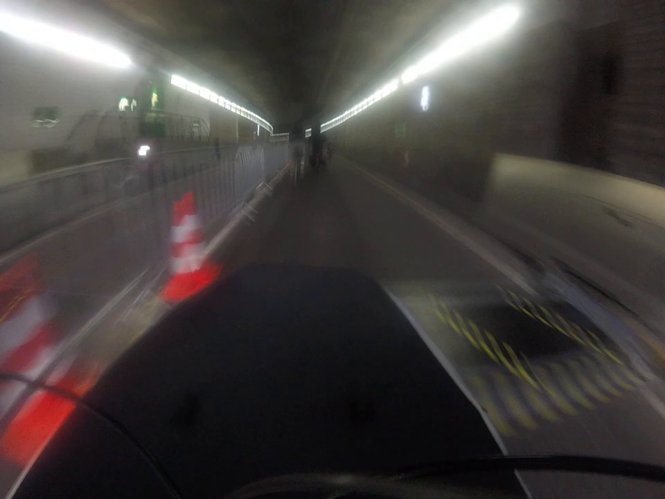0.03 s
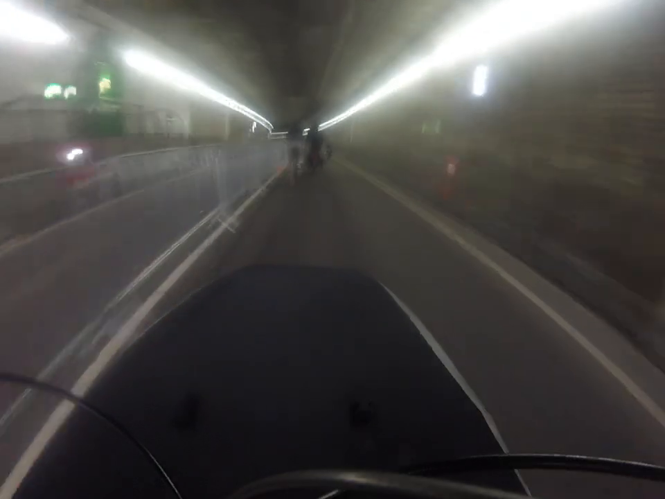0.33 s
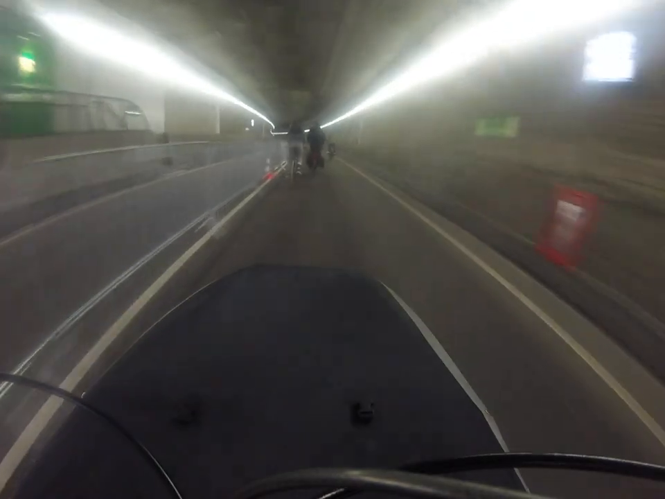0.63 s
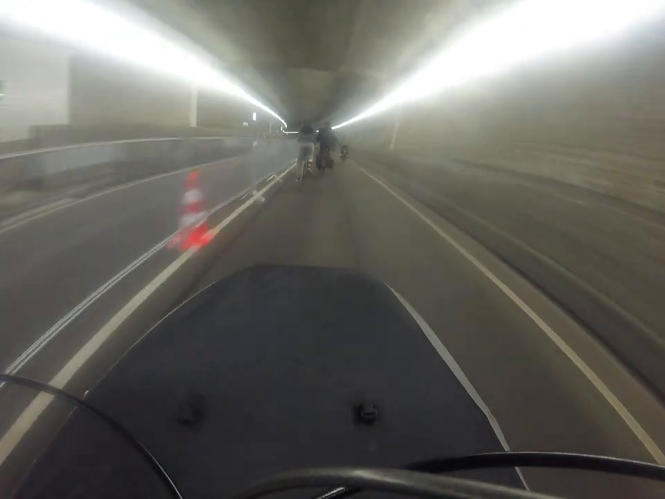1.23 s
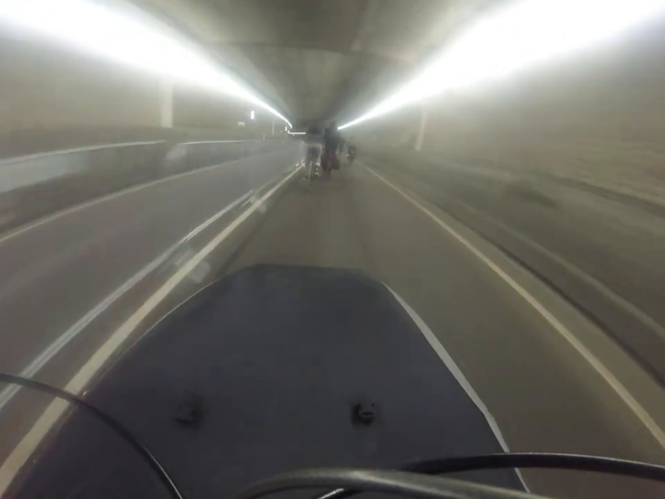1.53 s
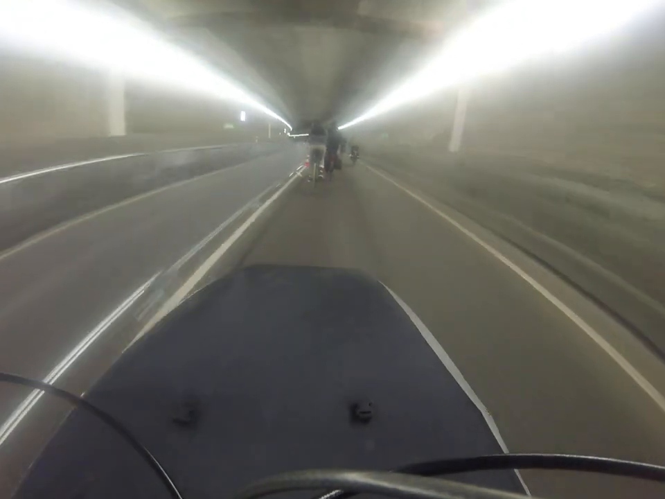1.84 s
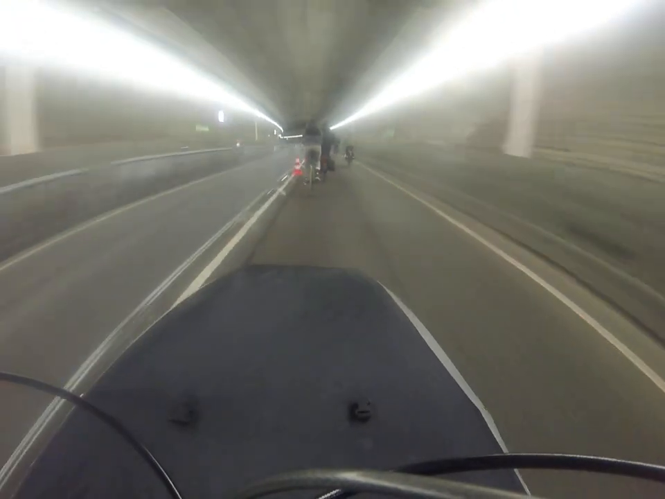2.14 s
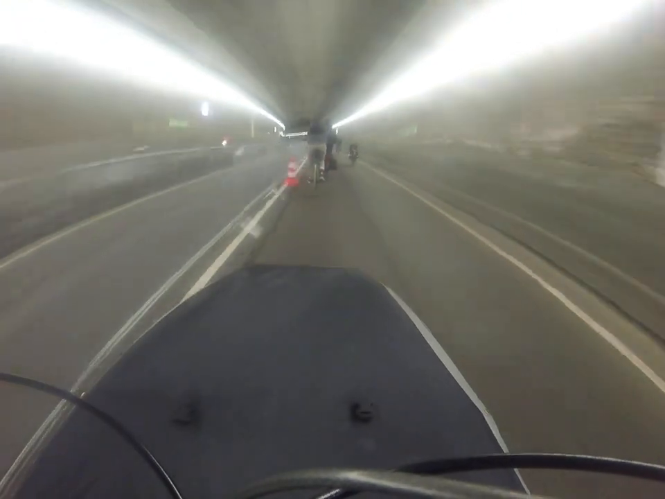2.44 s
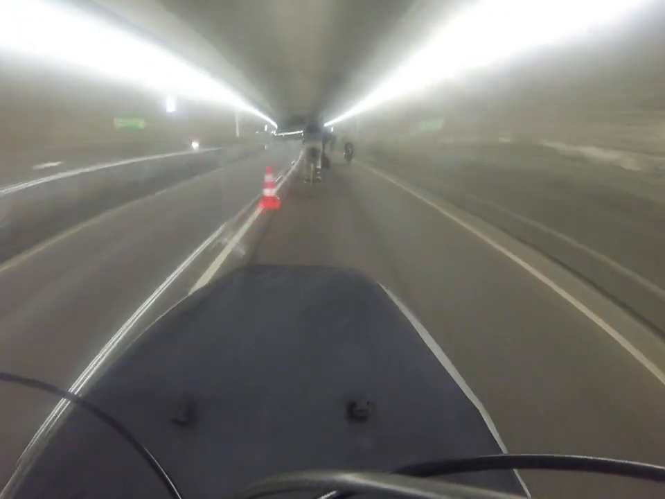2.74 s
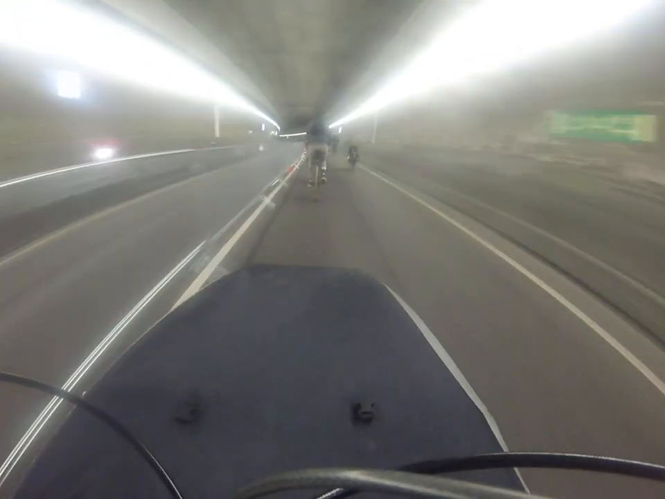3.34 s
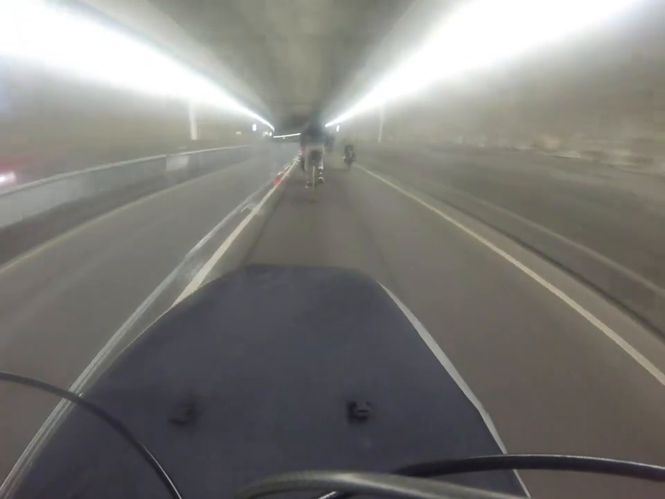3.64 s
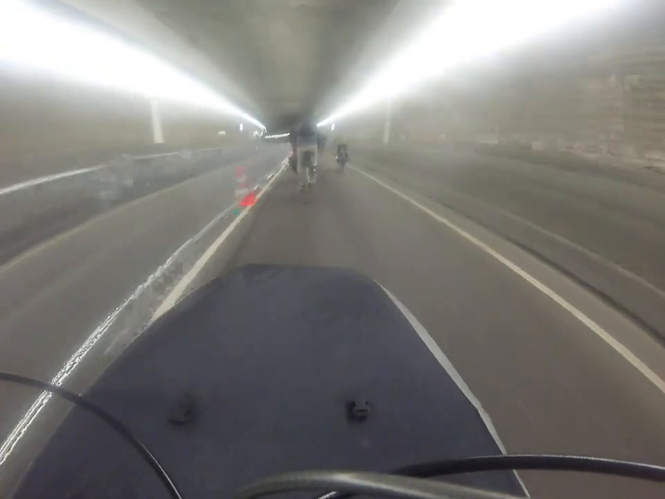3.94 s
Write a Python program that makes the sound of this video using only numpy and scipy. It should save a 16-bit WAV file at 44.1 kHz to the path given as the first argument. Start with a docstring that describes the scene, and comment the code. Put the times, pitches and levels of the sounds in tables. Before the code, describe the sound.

Heard up close, a moving bicycle rumbles and thumps along a concrete tunnel, with buffeting wind, humming tyres and scattered hollow knocks. Later the level suddenly drops, a loose part clacks, and the rumble creeps back.

```python
"""Faired bicycle in a road tunnel

Asphalt grain drums the shell, the frame booms, throbs and thumps over bumps, and the tread hums.
Wind buffets over a wash of tyre noise, chain rustle and a thin metal jingle. Panels knock, a loose
fitting clacks and a brake disc sings faintly as it rubs; these echo down the concrete tube.
Past the middle the whole sound ducks suddenly and creeps back."""
import sys
import numpy as np
from scipy import signal
from scipy.fft import rfft, irfft
from scipy.io import wavfile

SR = 44100
rng = np.random.default_rng(int(sys.argv[2]) if len(sys.argv) > 2 else 0)


def generate_wav(sig):
    """Save sig (samples, or channels by samples) to the path in sys.argv[1] as 16-bit PCM at SR."""
    pcm = np.round(np.clip(np.atleast_2d(sig).T, -1, 1) * 32767).astype(np.int16)
    wavfile.write(sys.argv[1], SR, pcm)


N = 176400

# Level rides for the jingle, the tyre and chain hiss, the wind, the frame's throb and boom, and the
# road's drumming on the shell. Each row: time in seconds, relative level in dB.
JINGLE_RIDE = [(0.05, -70), (0.15, -64), (0.38, -64.5), (0.6, -73), (1.5, -71.5), (2.4, -69.5),
               (2.59, -60.5), (2.8, -69.5), (3.1, -72.5), (4.0, -74)]
HISS_RIDE = [(0.05, -54), (0.14, -49.5), (0.26, -52), (0.39, -52), (0.55, -54), (0.72, -54.5), (1.0, -52.3),
             (1.5, -51.3), (2.0, -48.5), (2.36, -49), (2.45, -46), (2.49, -48.5), (2.75, -50.5), (3.1, -51),
             (3.6, -51.5), (4.0, -50.5)]
WIND_RIDE = [(0.05, -22.5), (0.5, -30), (0.8, -30.5), (1.4, -27.5), (1.75, -22.5), (2.4, -25.5),
             (2.7, -32.5), (3.3, -27.5), (3.7, -24.5), (4.0, -19.5)]
THROB_RIDE = [(0.05, -41), (1.3, -42), (1.4, -18), (1.48, -18), (1.57, -30), (1.68, -18.5), (1.79, -30),
              (1.87, -15.5), (2.0, -28), (2.2, -32), (4.0, -47)]
BOOM_RIDE = [(0.05, -23), (0.42, -21), (0.6, -28.5), (1.1, -19.5), (1.3, -29), (1.45, -24), (1.9, -25),
             (2.1, -21), (2.35, -22.5), (2.6, -18), (3.0, -22), (3.4, -25), (3.7, -16.5), (4.0, -28)]
ROAD_RIDE = [(0.05, -30), (0.2, -25.5), (0.45, -26.5), (0.75, -28.5), (1.0, -22.5), (1.22, -24.5),
             (1.55, -26), (1.8, -23.5), (2.05, -24), (2.42, -21), (2.6, -20), (2.85, -23.5), (3.0, -23),
             (3.25, -25), (3.6, -26), (4.0, -24)]
# EQ curves for wind, tyres and chain. Each row: frequency in Hz, relative gain in dB.
WIND_EQ = [(8, -24.5), (20, -4), (35, 5.5), (90, -15.5), (150, -1), (200, -10.5), (320, -13.5),
           (700, -24.5), (1500, -61)]
TYRE_EQ = [(300, -8), (700, 9), (1000, 4), (1500, -4), (2100, -6.5), (2800, -10.5), (3500, -17),
           (4300, -20), (7000, -26), (9300, -32.5), (10500, -40)]
CHAIN_EQ = [(3000, -19), (4200, -11.5), (4800, -0.5), (5450, 0.5), (5800, -2), (6200, -8), (6750, -7),
            (7100, -11.5), (8400, -16.5), (8750, -10.5), (9500, -28), (10000, -33.5)]
# The brake disc's tones. Each row: ratio to the pitch, relative level in dB.
DISC_TONES = [(.847, -4), (.925, -8.5), (1, -1.5)]
# Disc rubs, roughly one a wheel turn.
# Each row: centre in seconds, length in seconds, level in dB, pitch in Hz.
DISC_RUBS = [(0.995, 0.11, -65, 5320), (1.229, 0.14, -65, 5400), (1.488, 0.075, -63, 5380),
             (1.735, 0.11, -65.5, 5450), (2, 0.13, -66, 5437), (2.218, 0.11, -61.5, 5430),
             (2.43, .06, -63.5, 5530), (3.22, 0.043, -60, 5555), (3.27, .03, -62, 5580),
             (3.418, 0.046, -55.5, 5630), (3.497, .05, -62, 5570), (3.667, 0.04, -59, 5520),
             (3.706, 0.021, -59, 5620), (3.932, 0.14, -63, 5530)]
# Tiny bright ticks. Each row: start in seconds, level in dB, band centre in Hz.
BRIGHT_TICKS = [(2.456, -43, 7400), (2.587, -49, 6003), (2.694, -46, 6069), (3.735, -42, 5740)]
# Clacks of a loose fitting. Each row: start in seconds, level in dB, low-pass cutoff in Hz.
FITTING_CLACKS = [(0.062, -25, 2600), (2.594, -26, 910), (2.8432, -14.5, 5000), (2.8472, -18.5, 3000),
                  (2.861, -18.5, 2100), (2.867, -24, 1700)]
# The fitting's modes. Each row: frequency in Hz, relative level in dB, 60 dB decay time in seconds.
FITTING_MODES = [(580, -1, 0.07), (780, 1, .03), (1200, 3.5, 0.026), (1436, -4, .025), (1740, -6, 0.02),
                 (2110, -4.5, 0.022), (2760, -4.5, 0.016), (3155, -7.5, 0.018), (3780, -11.5, 0.02),
                 (5030, -16, .01), (6300, -15, .015)]
# Hits on a panel and on a small cover. Each row: start in seconds, level in dB, pitch in Hz.
PANEL_KNOCKS = [(0.059, -19.5, 510), (0.127, -12, 542), (0.1365, -11.5, 428), (0.180, -17, 474),
                (0.198, -19, 534), (0.217, -17, 421), (0.325, -9, 616), (0.445, -18.5, 440),
                (0.635, -17, 475), (0.892, -18.5, 467), (1.08, -18.5, 488), (1.536, -17, 428),
                (1.603, -17.5, 450), (1.728, -21.5, 316.6), (1.853, -18, 520), (2.070, -16.5, 477),
                (2.203, -16.5, 433), (2.385, -21.5, 451.5), (2.429, -11.5, 389)]
COVER_TAPS = [(0.083, -33, 1080), (0.179, -32, 1120), (0.214, -31, 1020), (2.495, -28, 1090),
              (2.512, -32, 1060), (2.599, -30, 1030), (3.138, -24, 1180), (3.171, -36, 1080)]
# Their modes. Each row: ratio to the pitch, relative level in dB, 60 dB decay time in seconds.
PANEL_MODES = [(.6, -11.5, 0.054), (0.789, 0, 0.021), (1, -0.5, 0.07), (1.299, -15, 0.021),
               (1.62, -27.5, 0.031)]
COVER_MODES = [(1, 4, 0.026), (1.22, -6.5, 0.019), (1.9, -11.5, 0.018)]
# The hum of the tyre tread. Each row: time in seconds, pitch in Hz, level in dB.
TREAD_HUM = [(0.051, 470.2, -43), (0.901, 463.2, -34), (1.152, 457.3, -54), (1.329, 457.6, -26),
             (1.44, 461, -34), (1.559, 459.7, -24.5), (1.78, 464, -37.5), (2.05, 468.4, -23.5),
             (2.179, 455, -30.5), (2.321, 450, -28), (2.5, 447, -30), (2.849, 431.8, -50),
             (3.001, 433, -23), (3.202, 448.4, -44.5), (3.551, 459.8, -35), (4.0, 457, -46)]
# Bumps that heave the frame. Each row: start in seconds, level in dB, pitch in Hz.
ROAD_BUMPS = [(0.05, -11, 42.1), (0.097, -9.5, 49.5), (0.143, -7.5, 45.6), (0.356, -11, 49.6),
              (2.257, -9.5, 43), (2.492, -4, 43.2), (2.703, -7.5, 30.5), (3.767, -11, 52.3)]
# The shell's resonances. Each row: centre in Hz, width in Hz, relative gain in dB.
SHELL_MODES = [(119, 28, -3), (164.8, 20.7, -6), (242.3, 34.3, -3), (301.3, 41, -8.5), (340.8, 25.5, -1),
               (406.5, 65, 0), (452, 51, -1.5), (502, 41, 0), (589, 117, -13), (688, 80, -13),
               (763, 95, -20), (909, 45, -19.5), (1026, 58, -26.5), (1397, 58, -30.5)]


def undb(db):
    """Decibels to gain."""
    return 10 ** (np.asarray(db) / 20)


def unit(x):
    """Scale to rms 1."""
    return x / np.sqrt(np.mean(x ** 2))


def clock():
    """Time of every sample, in seconds."""
    return np.arange(N) / SR


def ride(rows):
    """A fader move through (seconds, dB) points."""
    return undb(np.interp(clock(), *np.array(rows).T))


def wander(rate_hz):
    """Smooth random drift, rms 1."""
    f = np.arange(N // 2 + 1) * SR / N
    return unit(irfft(rfft(rng.standard_normal(N)) * np.exp(-(f / rate_hz) ** 2) * (f > 0), N))


def equalise(x, points):
    """EQ through (Hz, dB) points, rolled off past both ends, rms 1."""
    f = np.maximum(np.arange(N // 2 + 1) * SR / N, 1)
    hz, db = np.array(points).T
    gain = undb(np.interp(np.log(f), np.log(hz), db))
    roll_off = np.minimum(f / hz[0], 1) * np.minimum(hz[-1] / f, 1) ** 2
    return unit(irfft(rfft(x) * gain * roll_off, N))


def resonate(x, hz, width_hz):
    """A resonance with steep skirts: two band-passes in a row."""
    b, a = signal.iirpeak(hz, hz / (width_hz * np.pi / 2), fs=SR)
    return signal.lfilter(b, a, signal.lfilter(b, a, x))


def grains(per_s, spread_db=3):
    """A random spray of small, uneven impacts."""
    hit = rng.random(N) < per_s / SR
    polarity = np.sign(rng.standard_normal(N))
    return hit * polarity * undb(spread_db * np.minimum(rng.exponential(size=N), 5))


def decay(age, t60):
    """Envelope with a hard attack, falling 60 dB in t60 seconds."""
    return (age > 0) * np.exp(-np.log(1000) * np.clip(age / t60, 0, 10))


def ring(start, modes):
    """Decaying (Hz, dB, t60) modes struck together in alternating polarity, peak 1."""
    age = np.arange(SR // 2) / SR
    tone = sum((-1) ** k * undb(db) * np.sin(2 * np.pi * hz * age) * decay(age, t60)
               for k, (hz, db, t60) in enumerate(modes))
    return np.pad(tone / np.abs(tone).max(), (int(start * SR), N))[:N]


def tunnel(x, t60=5, predelay_s=.02, wet_db=-17.5):
    """The concrete tube returns a long, diffuse echo."""
    tail = rng.standard_normal(N) * decay(clock(), t60) * (clock() > predelay_s)
    return undb(wet_db) * signal.fftconvolve(x, tail / np.linalg.norm(tail))[:N]


def jingle():
    """A small metal part chatters at one high resonance."""
    return unit(resonate(grains(per_s=1800), hz=6480, width_hz=230)) * ride(JINGLE_RIDE)


def brake(waver_hz=8, flicker_db=2):
    """The disc brushes its pad and sings softly."""
    t, rubs = clock(), np.array(DISC_RUBS)
    touch = sum(undb(db) * np.exp(-(2 * (t - at) / length) ** 2) for at, length, db, _ in DISC_RUBS)
    pitch = np.interp(t, rubs[:, 0], rubs[:, 3])
    flicker = undb(flicker_db * wander(40))
    song = sum(undb(db) * np.sin(2 * np.pi * np.cumsum(ratio * pitch + waver_hz * wander(66)) / SR)
               for ratio, db in DISC_TONES)
    return touch * flicker * song


def tyres_and_chain(tyre_db=7, chain_db=-13):
    """A smooth wash of tyre noise and the chain's fine metallic rustle, both flickering slightly."""
    tyres = equalise(rng.standard_normal(N), TYRE_EQ) * undb(tyre_db + 0.35 * wander(25))
    chain = equalise(grains(per_s=5700, spread_db=-1), CHAIN_EQ) * undb(chain_db + wander(45))
    return (tyres + chain) * ride(HISS_RIDE)


def wind(gust_db=2, trim_db=-1):
    """Passing air buffets in low gusts."""
    rumble = equalise(rng.standard_normal(N), WIND_EQ)
    return rumble * undb(gust_db * wander(25) + trim_db) * ride(WIND_RIDE)


def ticks(t60=0.0053):
    """Tiny snaps of bright noise."""
    noise = rng.standard_normal(N)
    return sum(undb(db) * unit(resonate(noise, hz, hz / 2)) * decay(clock() - start, t60) / 2
               for start, db, hz in BRIGHT_TICKS)


def clacks(crack_db=-30.5, crack_hz=2320, crack_t60=0.016):
    """A loose fitting strikes and rings, with a crack of noise on the attack."""
    crack = undb(crack_db) * unit(resonate(rng.standard_normal(N), crack_hz, width_hz=crack_hz))
    out = np.zeros(N)
    for start, db, cutoff_hz in FITTING_CLACKS:
        blow = ring(start, FITTING_MODES) + crack * decay(clock() - start, crack_t60)
        out += undb(db) * signal.lfilter(*signal.butter(2, cutoff_hz, fs=SR), blow)
    return out


def knocks(hits, modes):
    """A panel or cover is struck and rings, short and hollow."""
    out = np.zeros(N)
    for start, db, hz in hits:
        tuned = [(hz * ratio, mode_db, t60) for ratio, mode_db, t60 in modes]
        out += undb(db) * ring(start, tuned)
    return out


def tread(width_hz=31.6, waver_hz=9, compression=0.9):
    """The tread drones in a rough, narrow band whose centre wanders with speed."""
    at, hz, db = np.array(TREAD_HUM).T
    rough = wander(width_hz) + 1j * wander(width_hz)
    evened = rough / (np.abs(rough) + .5) ** compression
    pitch = np.interp(clock(), at, hz) + waver_hz * wander(7.97)
    drone = (evened * np.exp(2j * np.pi * np.cumsum(pitch) / SR)).real
    return unit(drone) * undb(np.interp(clock(), at, db))


def throb(pitch_hz=57.44, waver_hz=3, flutter_db=2):
    """The frame throbs on one deep, wavering note that swells for a stretch."""
    tone = np.sqrt(2) * np.sin(2 * np.pi * np.cumsum(pitch_hz + waver_hz * wander(16)) / SR)
    return tone * undb(flutter_db * wander(41)) * ride(THROB_RIDE)


def frame(compression=0.42, boom_db=-1, bump_rise_s=0.017):
    """The frame booms on its tyres; each bump heaves it for a cycle or two."""
    boom = unit(resonate(rng.standard_normal(N), hz=61.2, width_hz=23.2))
    envelope = np.abs(signal.hilbert(boom))
    out = unit(boom / (envelope + .5) ** compression) * ride(BOOM_RIDE) * undb(boom_db)
    for start, db, hz in ROAD_BUMPS:
        age = np.maximum(clock() - start, 0)
        rise = age / bump_rise_s
        swell = (rise * np.exp(1 - rise)) ** 2
        out -= undb(db) * swell * np.sin(2 * np.pi * hz * age)
    return out


def shell(flutter_db=1.2, trim_db=-1):
    """Asphalt grain drums the shell's resonances in uneven bursts."""
    bursts = undb(flutter_db * wander(34))
    body = sum(undb(db) * resonate(grains(per_s=900) * bursts, hz, width_hz)
               for hz, width_hz, db in SHELL_MODES)
    return unit(body) * ride(ROAD_RIDE) * undb(trim_db)


def duck(at_s=2.458, attack_s=.0015, slow_db=-6, slow_s=0.98, fast_db=-4, fast_s=0.033):
    """A sudden drop in gain, released in a fast part and a slow part."""
    age = clock() - at_s
    attack = (1 + np.tanh(2 * age / attack_s)) / 2
    slow = slow_db * np.clip(1 - age / slow_s, 0, 1)
    fast = fast_db * np.sqrt(np.clip(1 - age / fast_s, 0, 1))
    return undb(attack * (slow + fast))


def scene():
    """The mono mix: a dry rolling bed plus rattles and brake with their echo, all ducked together."""
    bed = shell() + frame() + tread() + throb() + wind() + tyres_and_chain() + jingle()
    hollow_hits = knocks(PANEL_KNOCKS, PANEL_MODES) + knocks(COVER_TAPS, COVER_MODES)
    accents = hollow_hits + clacks() + ticks() + brake()
    return ((bed + accents + tunnel(accents)) * duck())[None]


def record(dry, start_s=0.035, fade_in_s=0.019, fade_out_s=.003, cutoff_hz=10100):
    """Quick fades at both ends and a steep high cut."""
    fade_in = np.clip((clock() - start_s) / fade_in_s, 0, 1) ** 2
    fade_out = np.clip((N / SR - clock()) / fade_out_s, 0, 1)
    high_cut = signal.ellip(8, .2, 70, cutoff_hz, fs=SR, output="sos")
    return signal.sosfilt(high_cut, dry * fade_in * fade_out)


dry = scene()
out = record(dry)
generate_wav(out)
```